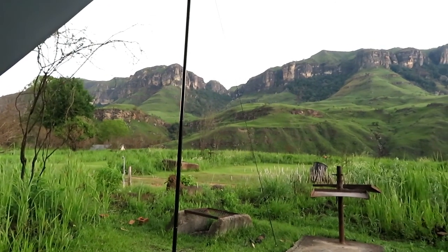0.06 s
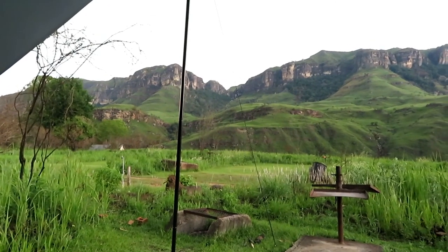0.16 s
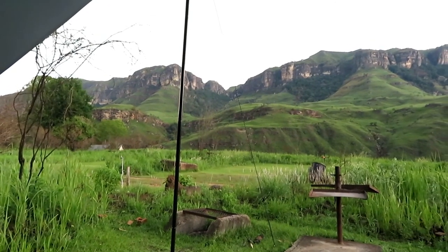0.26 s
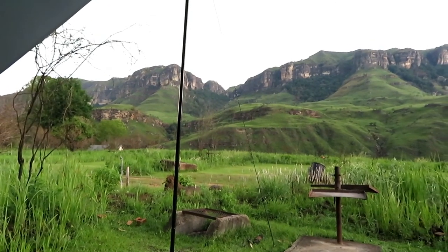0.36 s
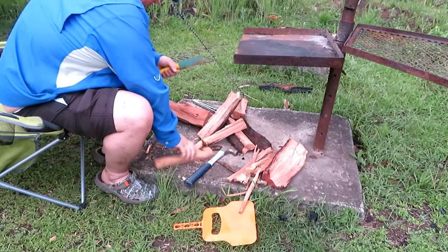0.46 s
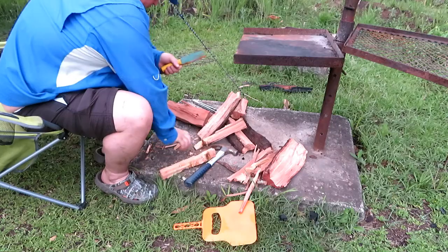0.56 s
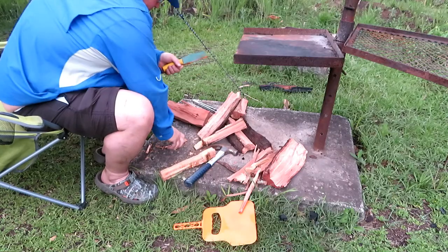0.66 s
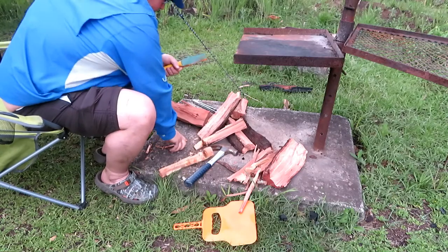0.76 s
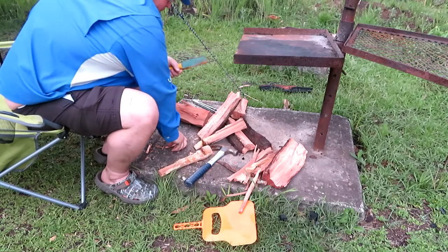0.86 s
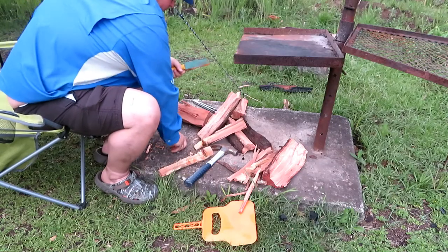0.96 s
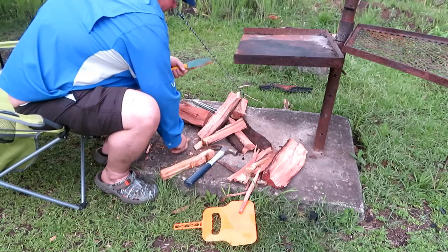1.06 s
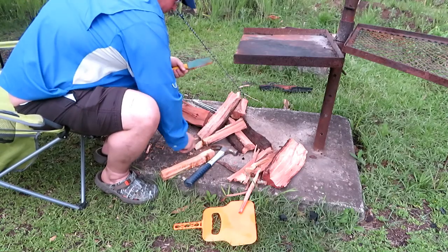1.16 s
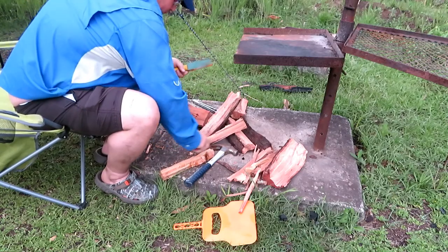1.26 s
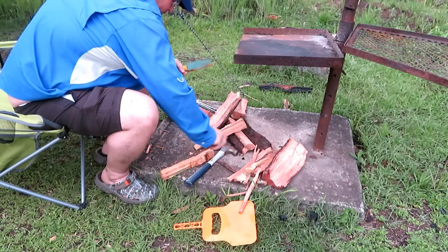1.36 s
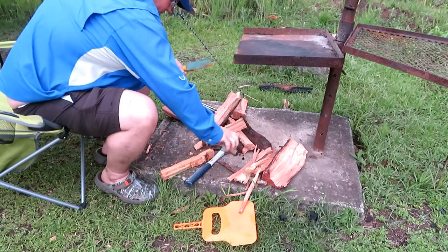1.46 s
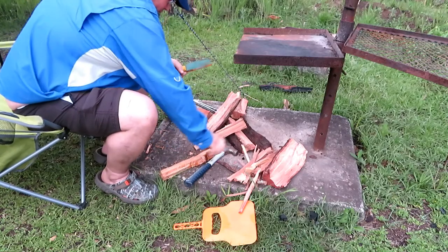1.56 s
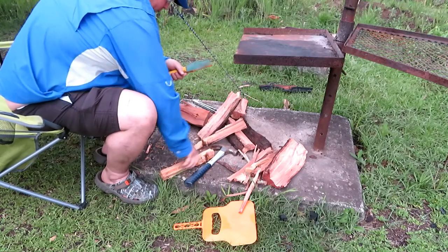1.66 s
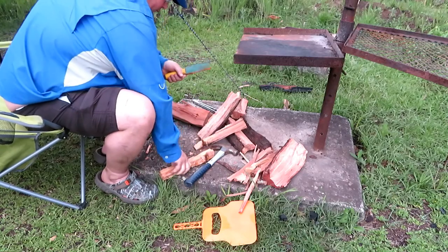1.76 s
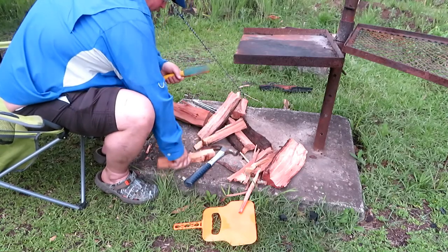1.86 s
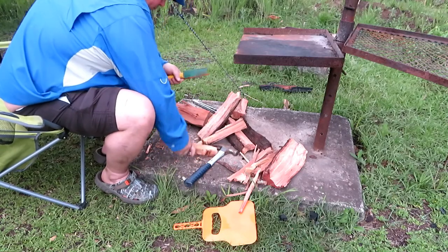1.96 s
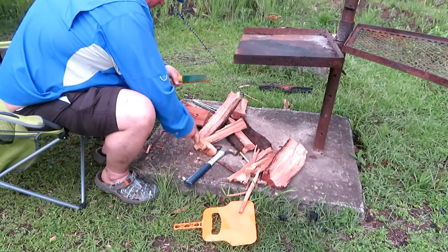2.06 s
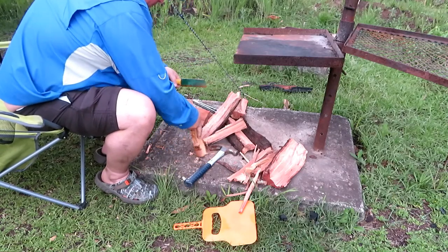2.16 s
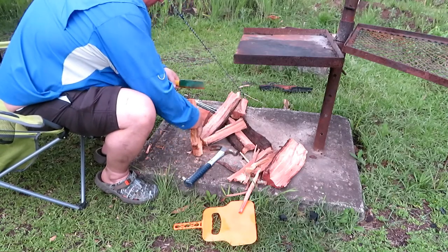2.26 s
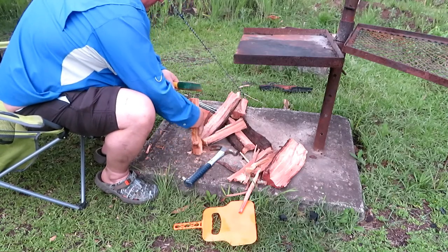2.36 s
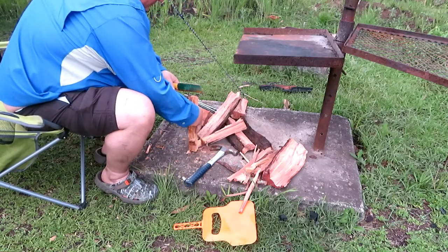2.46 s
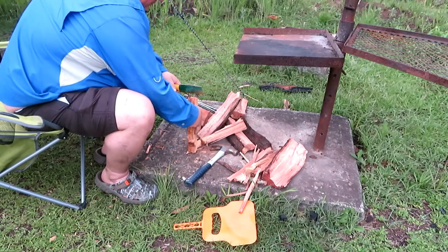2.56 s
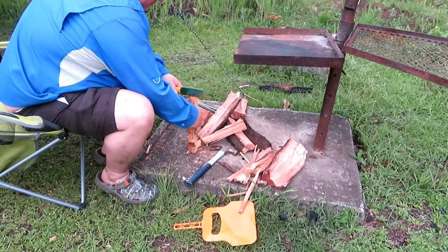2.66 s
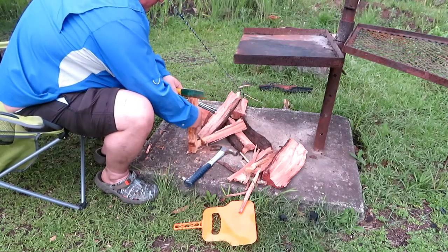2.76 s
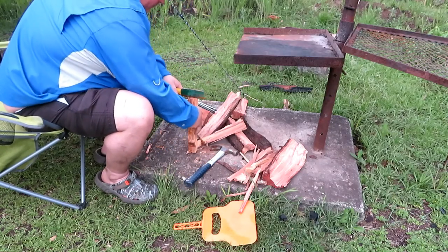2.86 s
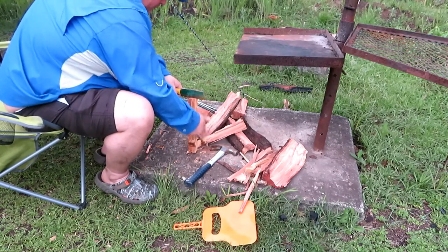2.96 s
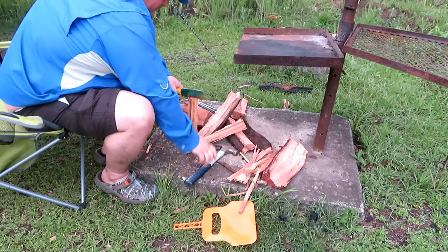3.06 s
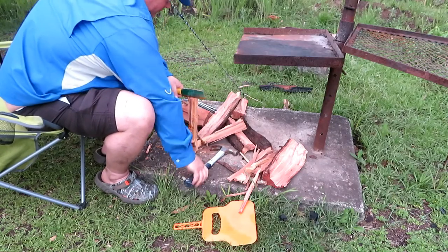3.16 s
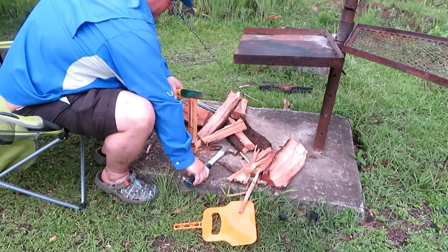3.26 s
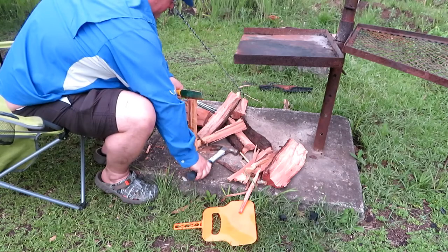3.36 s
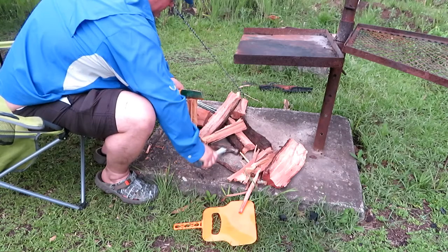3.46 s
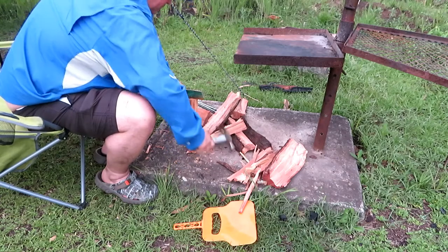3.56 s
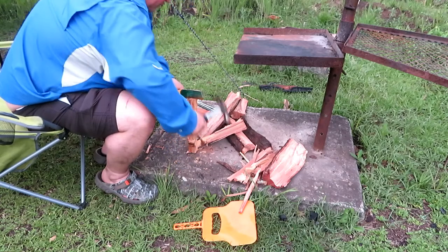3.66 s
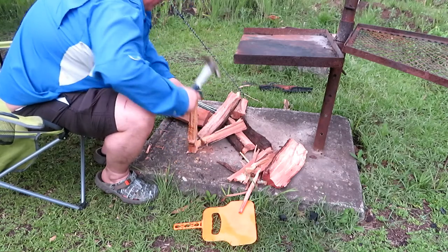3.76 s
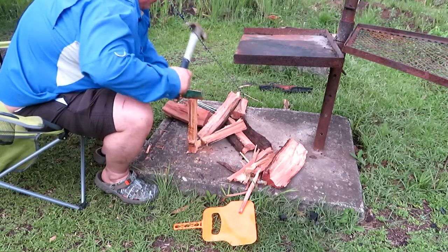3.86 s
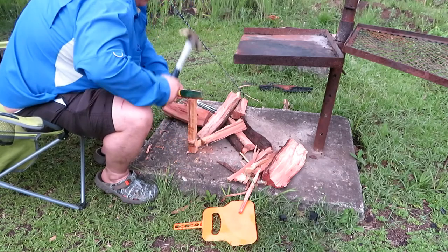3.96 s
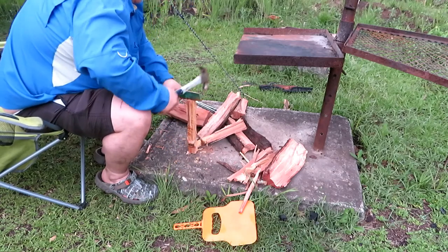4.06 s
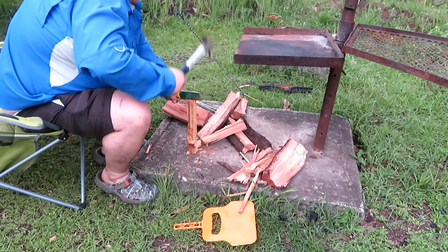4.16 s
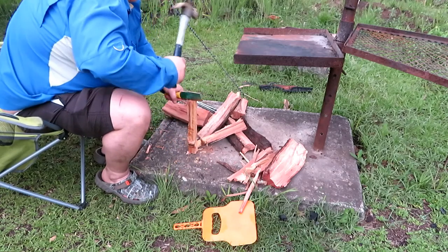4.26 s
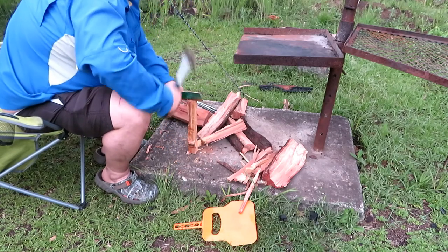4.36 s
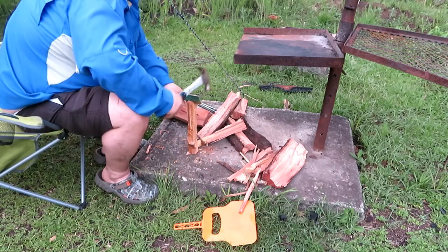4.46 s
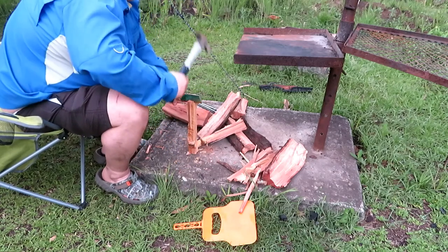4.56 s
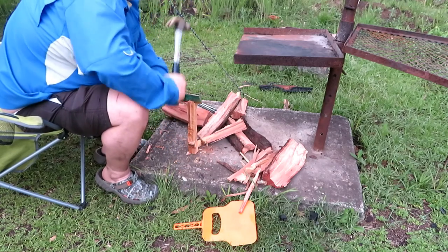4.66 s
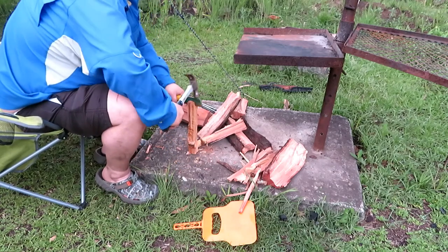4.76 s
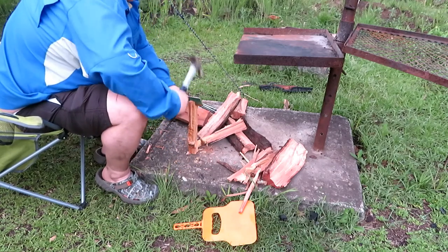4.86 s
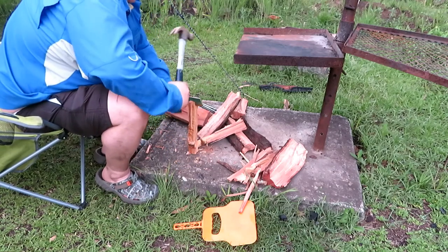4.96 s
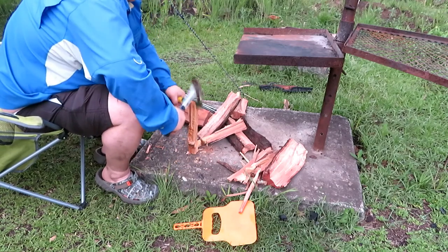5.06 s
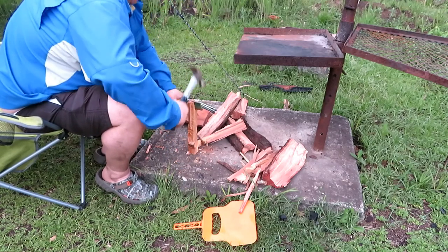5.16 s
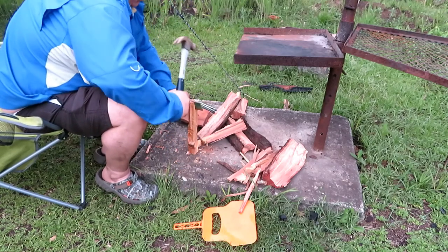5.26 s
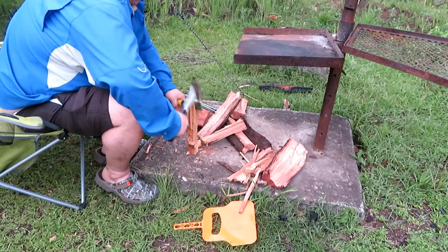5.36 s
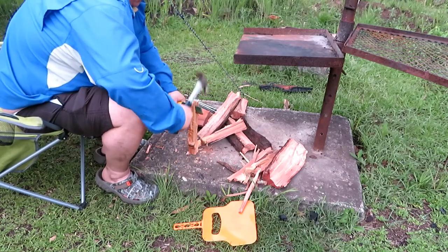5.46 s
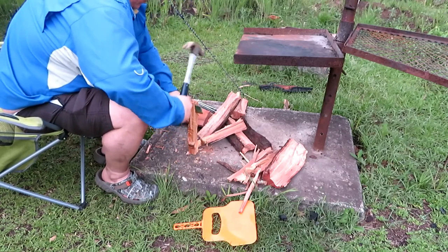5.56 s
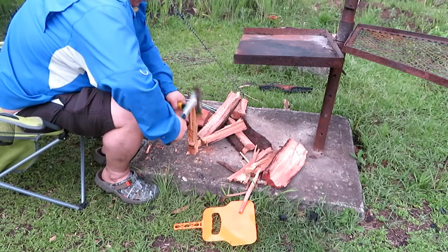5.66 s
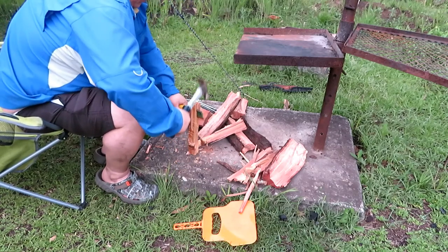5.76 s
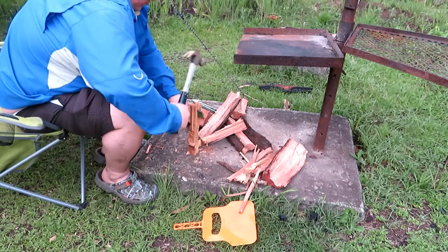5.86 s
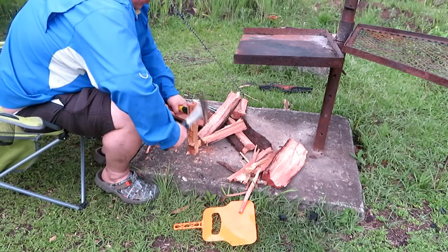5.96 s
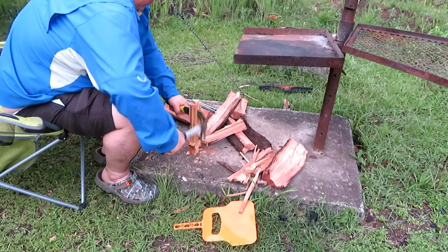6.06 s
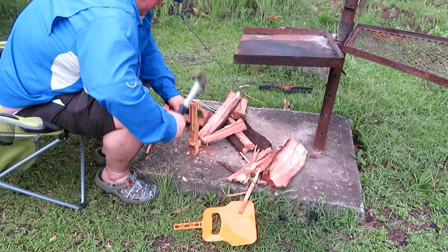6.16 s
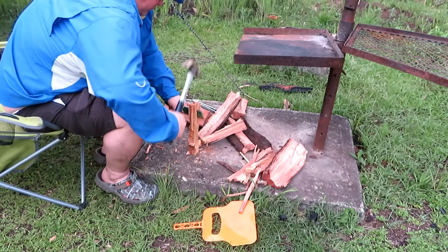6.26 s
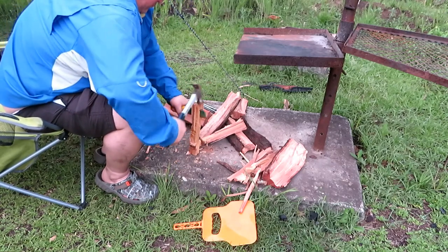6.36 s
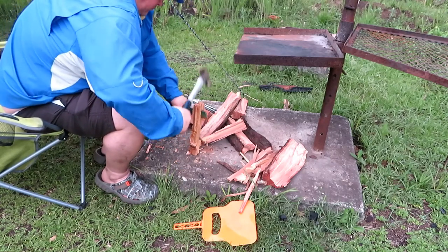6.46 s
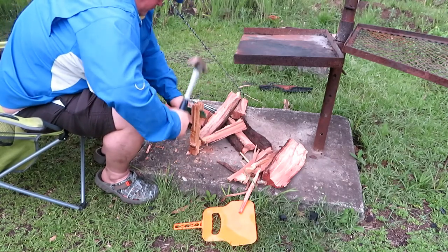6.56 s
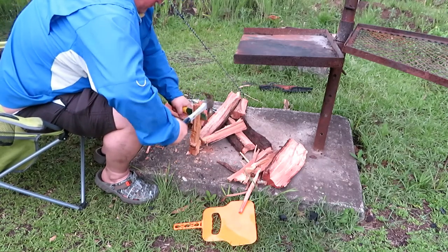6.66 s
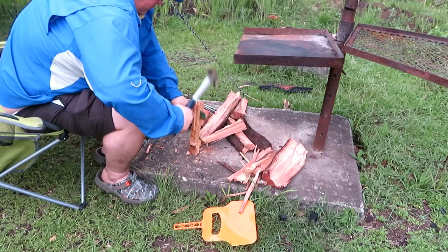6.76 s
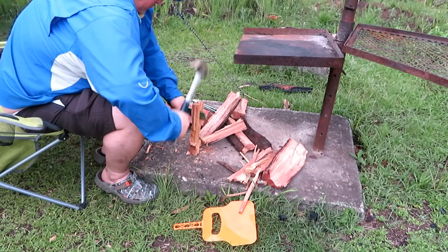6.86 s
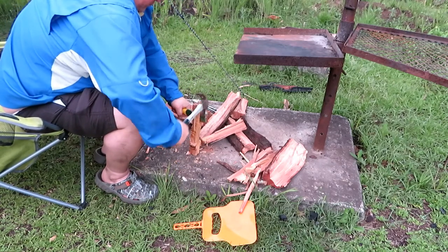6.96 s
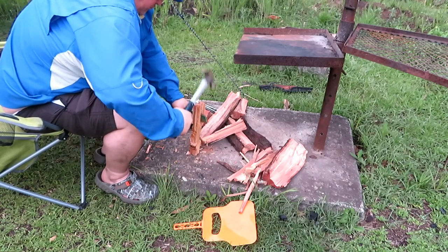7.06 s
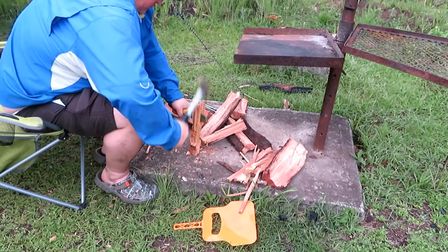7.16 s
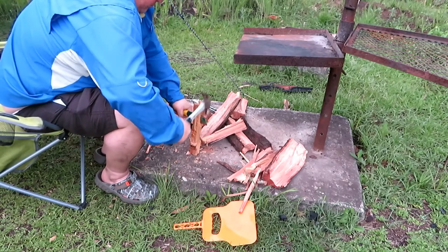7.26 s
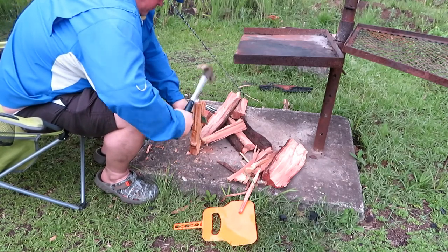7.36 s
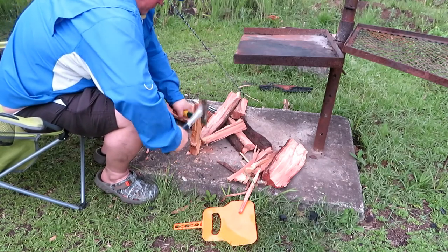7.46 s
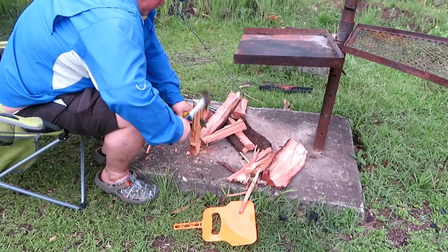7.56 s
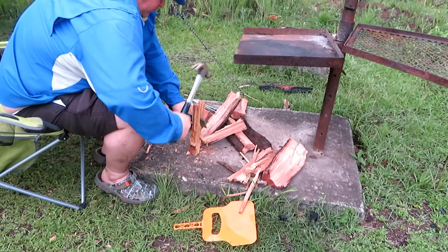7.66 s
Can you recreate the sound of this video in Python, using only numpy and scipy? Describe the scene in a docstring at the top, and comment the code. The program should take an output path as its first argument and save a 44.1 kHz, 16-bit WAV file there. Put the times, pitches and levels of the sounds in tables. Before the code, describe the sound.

A very short burst of raindrops snapping on taut cloth gives way to quiet birdsong and a soft rumble of wind outdoors. Close to the microphone, pieces of wood clack lightly as they are handled. Then a hatchet hammers a blade into firewood on a concrete slab in a steady run of bright, metallic cracks. The opening blows overload, the rest are lighter, and the log clacks on the slab during the last few.

```python
"""Rain drums on a tarp, each big drop a snap and a boom. At 0.4 s the scene cuts to a windy meadow:
birds whistle, sticks knock, cloth and splinters tick, and later an insect trills. From 4.1 s a hatchet
drives a blade into an upright log on a concrete slab, twelve blows, the first ones overloading.
Each crack rings wood, steel and slab and scatters off ground and woodpile. The meadow sinks in level
once the blows begin, and on the last ones the log rebounds on the slab."""
import sys
import numpy as np
from scipy import signal
from scipy.fft import rfft, irfft, next_fast_len
from scipy.io import wavfile
from scipy.ndimage import uniform_filter1d

SR = 44100
rng = np.random.default_rng(int(sys.argv[2]) if len(sys.argv) > 2 else 0)


def wav_record(signal):
    """Record a signal, one row per channel, as 16-bit PCM in the file named by sys.argv[1]."""
    frames = np.transpose(np.atleast_2d(signal))
    bounded = np.clip(frames, -1, 1)
    # unit amplitude maps onto the largest positive 16-bit level
    quanta = np.round(bounded * 32767).astype(np.int16)
    wavfile.write(sys.argv[1], SR, quanta)


N = 340893
RAIN_END_S, MEADOW_START_S = .3515, .3995

# big drops on the tarp: start_s, level_db
BIG_DROPS = [(0.004, -24), (0.02, -21.5), (0.029, -33), (0.059, -22), (0.079, -25), (0.085, -25),
             (0.097, -23), (0.174, -28.5), (0.187, -33), (0.214, -30), (0.259, -24.5), (0.291, -22.5),
             (0.302, -23), (0.323, -21.5), (0.335, -29)]
# resonances of the taut cloth: centre_hz, width_hz, gain_db
TARP_MODES = [(834.0, 790.0, 7.5), (1694, 600.0, 12.0), (2493, 1100.0, 7.0), (4222, 3800.0, -7.5)]
# tone of the rain bed: frequency_hz, density_db
RAIN_SPECTRUM = [(18, -35), (30, -4), (92, 3.5), (147, -3), (216, -9.5), (538, -21), (754, -20.5),
                 (1140, -20), (2030, -18.5), (10200, -38.5), (15000, -47.5)]
# how alike left and right are in the noise beds: frequency_hz, correlation
STEREO_LIKENESS = [(60, 1), (130, 1), (290, 0.75), (640, 0.31), (1400, 0.96), (3090, 0.45), (6790, 0.096),
                   (14900, 0.49)]
# fader for meadow air, wind, birds and insect; their levels ride on it: time_s, level_db
AMBIENCE_FADER = [(0.4, -59.5), (.73, -57), (1.1, -52.5), (2.26, -50.5), (2.6, -53), (3.9, -51),
                  (4.07, -52.5), (4.12, -59), (4.4, -62), (4.5, -65), (4.75, -65.5), (4.87, -71.5),
                  (5.32, -68.5), (6.3, -71.5), (6.6, -70), (7.73, -69)]
# tone of the meadow air: frequency_hz, density_db
MEADOW_SPECTRUM = [(88, -26.5), (150, 3), (366, -2), (528, -3), (582, -2.5), (1310, -5), (1830, -3.5),
                   (2090, -5.5), (4120, -5.5), (6560, -18), (11700, -25.5), (13700, -40.5), (15400, -62)]
# tone of the wind's rumble: frequency_hz, density_db
WIND_SPECTRUM = [(15, -28.5), (30, -3.5), (100, 1.3), (180, -7.5), (300, -30), (15000, -92.5)]
# swells of the wind: time_s, level_db
WIND_GUSTS = [(.4, 2), (1.2, 1), (2.2, -3), (3.9, -4), (4.3, 4), (4.6, -3), (6.3, -2), (6.55, 6), (6.8, -2),
              (7.73, 0.5)]
# gliding bird whistles: start_s, length_s, from_hz, to_hz, level_db
BIRD_GLIDES = [(.40, 0.053, 3200, 2700, 8.5), (0.399, 0.098, 4660, 3310, 5), (0.495, .03, 3024, 2300, 6),
               (0.515, 0.12, 2350, 2690, 3), (0.598, .06, 4250, 3500, -8), (.71, .05, 4400, 3400, 0),
               (0.775, 0.036, 2650, 2270, 4), (1.109, 0.17, 4750, 2900, 3.5), (1.281, .04, 4050, 3250, 7),
               (1.48, 0.074, 4750, 3800, 3), (1.487, 0.073, 6960, 6000, -5),
               (1.581, 0.077, 4700, 3348, 7.5), (1.767, 0.14, 4150, 3630, 5.5),
               (1.794, 0.051, 2850, 3100, 2), (1.89, 0.078, 7200, 6200, -8), (1.93, 0.045, 3420, 2640, 3),
               (1.983, 0.16, 4750, 2990, 7), (2.12, 0.043, 3950, 4400, 6), (2.202, 0.054, 3680, 2890, 6),
               (2.23, .04, 4250, 3820, 1), (2.238, 0.054, 5300, 4100, 3), (2.44, 0.13, 4700, 3200, 9),
               (2.495, 0.099, 3314, 2719, 5), (2.602, 0.054, 4630, 4240, 3.5),
               (2.958, 0.053, 4745, 4300, 3.5), (3.233, .19, 2640, 3900, 6.5), (3.3, 0.079, 1453, 1560, 2),
               (3.367, 0.063, 4500, 4190, 2.5), (3.417, 0.063, 4800, 3700, 7),
               (3.777, .13, 4590, 3190, 6.5), (4.203, .165, 4600, 2995, 1), (4.306, .08, 4400, 3560, 0),
               (4.574, 0.04, 4250, 3000, -2), (4.616, 0.13, 4700, 3100, 6.5), (4.968, .12, 4500, 3270, 4.5),
               (5.151, .14, 1058, 1190, -4.5), (5.232, .15, 4000, 3020, -1), (5.607, .1, 4050, 3520, 0.5),
               (6.161, .18, 4680, 2850, 6.5), (6.613, 0.077, 4500, 3570, 7),
               (6.875, 0.066, 7000, 6100, -9.5), (7.302, 0.086, 1620, 1230, -2),
               (7.362, .128, 4700, 3003, 8.5), (7.62, .08, 4000, 3650, 1.5)]
# sticks knocking, and at 4.508 s the log rebounding on the slab: start_s, peak_db, pitch_hz, t60_s, body_db,
# upper_mode_db
STICK_KNOCKS = [(.534, -38, 1340, .048, -14, -4), (0.553, -22, 1379, .06, -14.5, -9.5),
                (0.618, -37.5, 1350, 0.036, -6, -15), (.643, -35.5, 1460, 0.0069, -2, -6),
                (.676, -45.5, 2820, .024, -20, -20), (0.796, -39.5, 1404, 0.065, -8, -14),
                (1.276, -38.5, 1050, 0.017, -21, -18), (1.679, -30, 2600, 0.01, -32, -26),
                (1.708, -31.5, 1701, 0.012, -22, -21), (1.842, -34, 1438, 0.057, -14, -15),
                (1.929, -36, 1377, 0.052, -6, -16), (2.266, -31.5, 340, 0.025, -19, -19),
                (2.448, -30, 1350, 0.047, 0, 1), (2.463, -26.5, 1012, 0.045, -4.5, -11),
                (4.508, -44, 2880, 0.014, -27, -18)]
# cloth and splinters ticking: start_s, peak_db, t60_s
SPLINTER_TICKS = [(0.5494, -55, 0.03), (0.848, -51, 0.031), (.9472, -47, 0.17), (.9961, -52, .09),
                  (1.0247, -40.5, 0.041), (1.0493, -52, 0.098), (1.2436, -50.5, .043), (1.28, -47, 0.022),
                  (1.6044, -37.5, .034), (1.7352, -38, 0.095), (1.7544, -43, 0.11), (1.7789, -36.5, 0.014),
                  (1.8692, -47.5, 0.22), (3.518, -52, 0.24), (4.7628, -54, 0.14), (4.99, -64.5, 0.045),
                  (5.8387, -59.5, 0.055), (5.8683, -59.5, 0.035), (6.199, -63.5, .05), (7.3783, -60, .05)]
# treble colour of a tick: centre_hz, width_hz, gain_db
TICK_MODES = [(7500, 5800, 0.5), (10400, 12000, -4)]
# short piping bird calls: start_s, length_s, top_hz, level_db
BIRD_PIPES = [(0.952, 0.051, 1950, 15.5), (1.227, 0.066, 1913, 17), (1.505, 0.087, 1577, 13.5),
              (2.712, 0.062, 1954, 12.5), (2.993, 0.053, 1900, 14.5), (4.861, 0.045, 1970, 13.5)]
# an insect's trills: start_s, length_s
INSECT_TRILLS = [(2.783, .147), (3.18, .18), (3.289, .092), (3.493, .093), (3.679, .174), (4.149, .155),
                 (5.621, .095), (6.171, .1), (6.519, 0.15)]
# hatchet blows: start_s, log_db, deep_log_db, steel_db, slab_db, blade_ring_db, echo_db, crack_t60_s
HATCHET_BLOWS = [(4.0806, 6, -4.5, 1.5, -13, -39.5, -25.5, .018),
                 (4.4424, 4, -8, -3.5, -21.5, -40, -28, 0.016),
                 (4.802, -3.5, -15.5, -5, -30.5, -55.5, -30, .022),
                 (5.121, -10.5, -24.5, -13, -32.5, -40, -32.5, 0.026),
                 (5.4253, -9.5, -18.5, -12, -34.5, -42, -32.5, 0.015),
                 (5.7237, -7.5, -21, -12, -37, -45, -33.5, .017),
                 (6.0175, -10.5, -19, -22.5, -32, -70.5, -38.5, 0.015),
                 (6.37, -11, -2, -30.5, -17, -65.5, -34, 0.014),
                 (6.6838, -11.5, -20.5, -11, -35, -44, -36.5, 0.021),
                 (6.9715, -9, -22, -11.5, -33.5, -53, -35, 0.019),
                 (7.2475, -10, -21.5, -13.5, -31.5, -44, -36, 0.029),
                 (7.5245, -10.5, -18.5, -13, -34.5, -44, -35.5, 0.03)]
# the log's bright crack, its deep knock, the steel's clink, the slab's thud: centre_hz, width_hz, gain_db
LOG_MODES = [(2773, 220, 3.5), (3310, 300, -7.5), (2550, 700, -5), (4182, 300, -8.5)]
DEEP_LOG_MODES = [(1880, 470, 7), (1430, 1200, -10), (1093, 110, -8), (734, 230, -6.5)]
STEEL_MODES = [(5730, 790, -3), (6210, 230, -1), (6830, 1100, 3.1), (7870, 100, -11), (8900, 200, -9.5),
               (10705, 410, -6), (11350, 400, 0), (11400, 170, -16.5), (15100, 720, -24.5)]
SLAB_MODES = [(105, 110, 0), (200, 200, 0), (330, 260, -4), (540, 300, -10)]
# decay of the echo off ground and woodpile: frequency_hz, t60_s
ECHO_DECAY = [(100, 0.43), (500, 0.13), (1500, 0.24), (3000, 0.13), (7000, 0.074), (14000, 0.13)]
# tone of that echo: frequency_hz, gain_db
ECHO_SPECTRUM = [(60, -23.5), (200, -13), (600, -10.5), (1500, -12), (2250, -7), (2680, 4), (3200, -4.5),
                 (4500, -8), (7500, -3.5), (12000, -13), (15500, -40)]
# long rings of the blade and of a grate: pitch_hz, gain_db, t60_s
BLADE_RINGS = [(5677, 0, .15)]
GRATE_RINGS = [(354.53, 1.1, 2.2), (361, -8, 1.5), (734.5, -2.5, 1.5), (720.8, -2.5, .6)]
# phase lead of left over right for handling and blows: frequency_hz, lead_rad
LEFT_LEAD = [(20, 0), (2500, .05), (4400, .4), (5300, -.2), (8400, .45), (10200, .6), (15000, .4)]
# hoarse bird chirps: start_s, length_s, pitch_hz, level_db
BIRD_CHURRS = [(4.55, .16, 2520, 7.5), (5.889, 0.13, 2570, 8)]
# the log rebounding on the slab: start_s, peak_db
LOG_REBOUNDS = [(6.437, -53), (6.965, -30), (7.001, -39.5), (7.276, -33.5), (7.551, -31)]
# clack of a rebound: centre_hz, width_hz, gain_db
REBOUND_MODES = [(1650, 300, 0), (3400, 500, -8), (500, 300, -6), (2000, 3000, -6)]


def gain_of(db):
    return 10 ** (np.asarray(db) / 20)


def unit_rms(x):
    return x / np.sqrt(np.mean(x ** 2) + 1e-20)


def unit_peak(x):
    """Bring a hit's peak to roughly 1, judged by its loudest 4.5 ms."""
    return x / (4 * np.sqrt(uniform_filter1d(x ** 2, 200).max()) / 3 + 1e-20)


def curve_at(points, hz):
    """Read a curve along a log frequency axis."""
    point_hz, value = np.transpose(points)
    return np.interp(np.log(hz + 1), np.log(point_hz + 1), value)


def add(mix, start_s, sound):
    part = mix[round(start_s * SR):][:len(sound)]
    part += sound[:len(part)]


def resonate(x, modes, tuning=1):
    """Parallel band-pass resonances of alternating polarity."""
    bands = (gain_of(db) * signal.lfilter(*signal.iirpeak(min(hz * tuning, 20000), hz / width, SR), x)
             for hz, width, db in modes)
    return sum((-1) ** k * band for k, band in enumerate(bands))


def burst(t60_s, size, hold=1, rise_s=0.00026):
    """Noise with a sharp attack and a quick decay; hold over 1 keeps it up before it dies."""
    t = np.arange(size) / SR
    decay = gain_of(-60 * (t / max(t60_s, .003)) ** hold)
    return rng.standard_normal(size) * decay * (1 - np.exp(-t / rise_s))


def noise_bed(spectrum, patchy_db):
    """Stereo noise of a given tone, with drifting louder and softer patches; rms 1."""
    frames, hz = N // 256 + 5, np.fft.rfftfreq(1024, 1 / SR)
    left_re, left_im, side_re, side_im, patches = rng.standard_normal((frames, 513, 5)).T
    patches = unit_rms(uniform_filter1d(uniform_filter1d(patches, size=12, axis=0), size=12, axis=1))
    likeness = np.clip(curve_at(STEREO_LIKENESS, hz), -1, 1)[:, None]
    left = left_re + 1j * left_im
    right = likeness * left + np.sqrt(1 - likeness ** 2) * (side_re + 1j * side_im)
    spectra = np.array([left, right]) * gain_of(curve_at(spectrum, hz)[:, None] + patchy_db * patches)
    return unit_rms(signal.istft(spectra, nperseg=1024, noverlap=768)[1][:, :N])


def reverb_tail(t60_curve, predelay, size):
    """A stereo noise tail, each band dying at its own speed; predelay and size are in samples."""
    taps = rng.standard_normal((2, size)) * (np.arange(size) > predelay)
    taps[1] = .8 * taps[0] + .6 * taps[1]  # narrows the image
    hz, t, spectra = signal.stft(taps, SR, nperseg=128)
    decay = gain_of(-60 * t / curve_at(t60_curve, hz)[:, None])
    tails = signal.istft(spectra * decay, SR, nperseg=128)[1]
    return tails / np.linalg.norm(tails[0])


def rain_on_tarp():
    """Drops snap on taut cloth, which booms like a slack drum; small drops patter between."""
    out = np.zeros(N)
    t = np.arange(6000) / SR
    snap = -np.exp(-t / 0.00042)  # the cloth is pushed in at once
    for start_s, db in BIG_DROPS:
        splash = unit_peak(resonate(burst(0.023, size=6000), TARP_MODES, tuning=rng.uniform(0.79, 1.0)))
        add(out, start_s, gain_of(db) * (0.52 * splash + 0.54 * snap))
        boom_db, boom_hz = -28.5 + 2 * rng.uniform(-0.83, 1), rng.uniform(58.5, 127.0)
        add(out, start_s, gain_of(boom_db - 60 * t / 0.17) * np.sin(2 * np.pi * boom_hz * t))
    strength = gain_of(3.9 * np.minimum(rng.exponential(1, N), 4))
    patter = strength * (rng.random(N) < 500 / SR) * rng.choice([-1, 1], N)  # about 500 drops a second
    out += gain_of(-40) * unit_rms(resonate(patter, TARP_MODES) + 0.0167 * patter)
    return out + gain_of(-36) * noise_bed(RAIN_SPECTRUM, patchy_db=0.2)


def whistle(length_s, pitch_hz_at, db):
    """A slightly husky bird note; pitch_hz_at gives its pitch from start (0) to end (1)."""
    progress = np.linspace(0, 1, max(round(length_s * SR), 100))
    waver, flutter = unit_rms(uniform_filter1d(rng.standard_normal((2, len(progress))), size=150))
    cycles = np.cumsum(pitch_hz_at(progress) * (1 + .009 * waver)) / SR
    return gain_of(db + 3.0 * flutter) * np.sin(2 * np.pi * cycles) * np.sin(np.pi * progress) ** 0.33


def bird_glide(length_s, from_hz, to_hz, db, swoop=2.4, fade_db=-5):
    """A whistle that moves fastest at its high end, flattens at its low end and fades as it goes."""
    bend = swoop * np.sign(to_hz - from_hz)
    note = whistle(length_s, lambda u: from_hz + (to_hz - from_hz) * np.expm1(bend * u) / np.expm1(bend), db)
    return note * gain_of(fade_db * np.linspace(-.5, .5, len(note)))


def birds():
    """Near calls and a far chorus of falling notes, blurred by trees and echoed by the hillside."""
    near, far = np.zeros(N), np.zeros(N)
    for call, score in ((bird_glide, BIRD_GLIDES), (bird_pipe, BIRD_PIPES), (bird_churr, BIRD_CHURRS)):
        for start_s, *settings in score:
            add(near, start_s, call(*settings))
    for when, height, length, loudness in rng.random((260, 4)):
        top_hz = 3300 + 2000 * height
        add(far, when * N / SR, bird_glide(.04 + 0.076 * length, top_hz, 0.73 * top_hz, -8 + 9 * loudness))
    trees = reverb_tail([(1000, .1), (6000, .1)], predelay=60, size=6000)
    hills = reverb_tail([(1000, 1.0), (6000, 0.38)], predelay=1500, size=40000)
    blur = signal.fftconvolve((.5 * near + .3 * far)[None], trees, axes=1)[:, :N]
    echo = signal.fftconvolve((0.26 * near + 1.3 * far)[None], hills, axes=1)[:, :N]
    return 1.13 * near + blur + echo


def wood_handling():
    """Sticks and the rebounding log ring briefly after a scrape; cloth and splinters tick on top."""
    out = np.zeros(N)

    def hit(start_s, db, scrape_t60_s, modes):
        add(out, start_s, gain_of(db) * unit_peak(resonate(burst(scrape_t60_s, size=5000), modes)))

    for start_s, db, hz, t60_s, body_db, upper_db in STICK_KNOCKS:
        width_hz = np.log(1000) / (np.pi * t60_s)
        ring = [(hz, width_hz, 0.1), (2.206 * hz, width_hz, upper_db)]
        body, snap = (500, 300, body_db), (2000, 3000, -26.5)
        hit(start_s, db, 0.032773, ring + [body, snap])
    for start_s, db in LOG_REBOUNDS:
        hit(start_s, db, 0.044, REBOUND_MODES)
    for start_s, db, t60_s in SPLINTER_TICKS:
        hit(start_s, db, t60_s, TICK_MODES)
    return out


def bird_pipe(length_s, top_hz, db, crest=.42):
    """A whistle that arches up to its top and down again, further the longer it lasts."""
    droop = 2.1 * length_s  # share of the pitch lost by the end
    return whistle(length_s, lambda u: top_hz * (1 - droop * ((u - crest) / (1 - crest)) ** 2), db)


def insect(puff_rate_hz=75):
    """Trills of quick noise puffs, ringing near 5.3 kHz."""
    out, band = np.zeros(N), [(5300, 730, 0.1)]
    for start_s, length_s in INSECT_TRILLS:
        t = np.arange(round(length_s * SR)) / SR
        swell = np.sin(np.pi * t / length_s)
        puffs = rng.standard_normal(len(t)) * np.sin(np.pi * puff_rate_hz * t) ** 4 * swell
        add(out, start_s, gain_of(-10.5) * unit_rms(resonate(resonate(puffs, band), band)))
    return out


def hatchet_blow(log_db, deep_db, steel_db, slab_db, blade_db, echo_db, t60_s, size=60000):
    """One crack drives log, steel and slab; its echo follows, and blade and grate ring on."""
    # harder blows hold longer and then stop short
    crack = burst(t60_s, size, hold=1.5 + 0.0284 * log_db, rise_s=0.00047)
    crack[30] += 4  # the first contact of steel
    dull_crack = resonate(crack, [(2208.5, 10000, 0.1)])  # wood takes up little of the highest treble
    low_crack = resonate(crack, [(292, 740, 0.1)])
    hit = gain_of(log_db) * unit_peak(resonate(dull_crack, LOG_MODES))
    hit += gain_of(deep_db) * unit_peak(resonate(dull_crack, DEEP_LOG_MODES))
    hit += gain_of(steel_db) * unit_peak(resonate(crack, STEEL_MODES))
    hit += gain_of(slab_db) * unit_peak(resonate(low_crack, SLAB_MODES))
    low_cut = signal.butter(2, 75, "high", fs=SR, output="sos")  # the blows carry no deep bass below about 75 Hz
    hit = signal.sosfilt(low_cut, hit)
    # the echo is brighter as steel outweighs the deep log
    echo = woodpile_echo(size, tilt_db_per_octave=1.1 + 0.057 * (steel_db - deep_db))
    rings = metal_ring(BLADE_RINGS, blade_db, size) + metal_ring(GRATE_RINGS, deep_db - 56, size)
    return hit + gain_of(echo_db) * echo + rings


def metal_ring(modes, level_db, size):
    """Jolted metal rings on as pure, decaying tones."""
    t = np.arange(size) / SR
    ring = sum(gain_of(level_db + db - 60 * t / t60_s) * np.sin(2 * np.pi * hz * t)
               for hz, db, t60_s in modes)
    return ring * np.minimum(1, np.minimum(t / 0.0044, (t[-1] - t) / .1))  # fade in and out


def woodpile_echo(size, tilt_db_per_octave):
    """Ground and woodpile scatter a blow into a short, grainy tail."""
    hz = np.fft.rfftfreq(size, 1 / SR)
    colour = gain_of(curve_at(ECHO_SPECTRUM, hz) + tilt_db_per_octave * np.log2(hz / 2800 + .03))
    echo = irfft(rfft(reverb_tail(ECHO_DECAY, predelay=120, size=12000), size) * colour)
    echo *= gain_of(1.9 * unit_rms(uniform_filter1d(rng.standard_normal(size), size=130)))  # scatterers
    return echo / np.sqrt(np.sum(echo ** 2) / 1000)


def bird_churr(length_s, pitch_hz, db, width_hz=260):
    """A hoarse chirp: breath noise through one narrow resonance."""
    size, throat = round(length_s * SR), [(pitch_hz, width_hz, 0)]
    breath = resonate(resonate(rng.standard_normal(size), throat), throat)
    return gain_of(db) * unit_rms(breath) * np.hanning(size) ** .5


def scene():
    """Rain, a blink of silence, then the meadow with the woodwork in front."""
    t = np.arange(N) / SR
    fader = gain_of(np.interp(t, *np.transpose(AMBIENCE_FADER)))
    meadow = gain_of(6.5) * noise_bed(MEADOW_SPECTRUM, patchy_db=2.0) + birds() + insect()
    gusts = gain_of(np.interp(t, *np.transpose(WIND_GUSTS)))
    wind = gusts * noise_bed(WIND_SPECTRUM, patchy_db=1.5)
    woodwork = np.zeros((2, N)) + wood_handling()
    for start_s, *settings in HATCHET_BLOWS:
        for channel, sound in zip(woodwork, hatchet_blow(*settings)):
            add(channel, start_s, sound)
    size = next_fast_len(N)
    lead_rad = curve_at(LEFT_LEAD, np.fft.rfftfreq(size, 1 / SR))
    woodwork = irfft(rfft(woodwork, size) * np.exp([[.5j], [-.5j]] * lead_rad), size)[:, :N]
    return rain_on_tarp() * (t < RAIN_END_S) + (fader * (meadow + wind) + woodwork) * (t > MEADOW_START_S)


def record(dry):
    """The loudest blows clip; a steep low-pass then takes off the top above 15.6 kHz."""
    clipped = np.clip(dry, -.97, .97)
    low_pass = signal.firwin(511, 15600, window=("kaiser", 9), fs=SR)
    return signal.oaconvolve(clipped, low_pass[None], "same")


dry = scene()
out = record(dry)
wav_record(out)
```